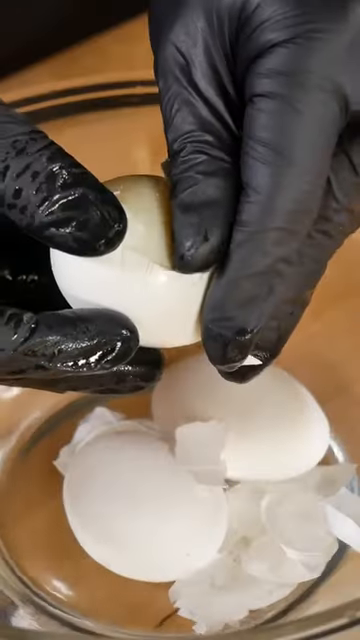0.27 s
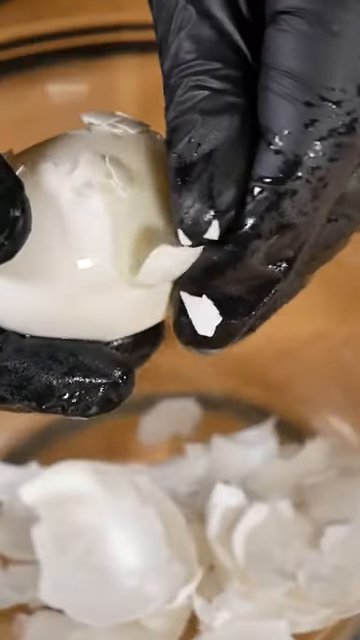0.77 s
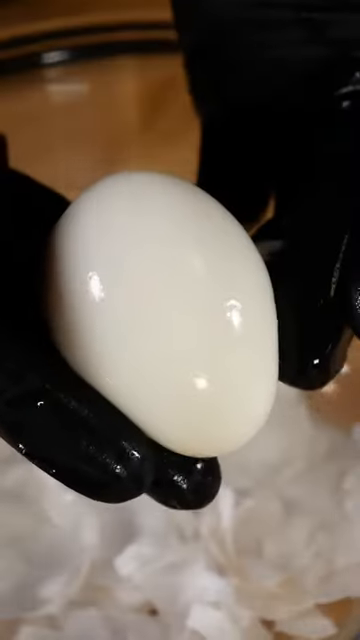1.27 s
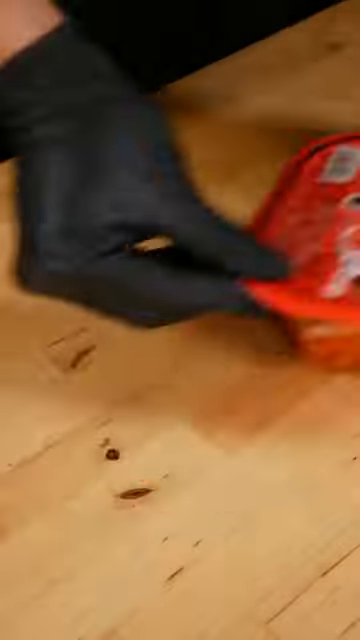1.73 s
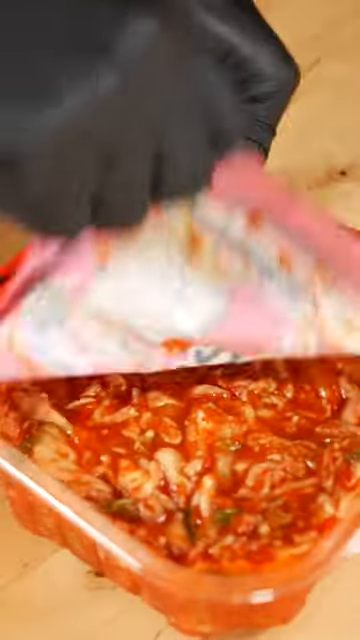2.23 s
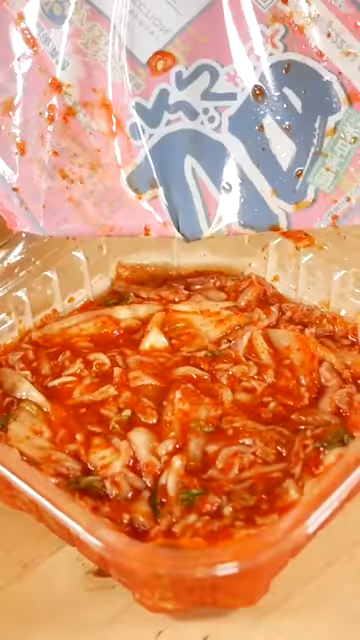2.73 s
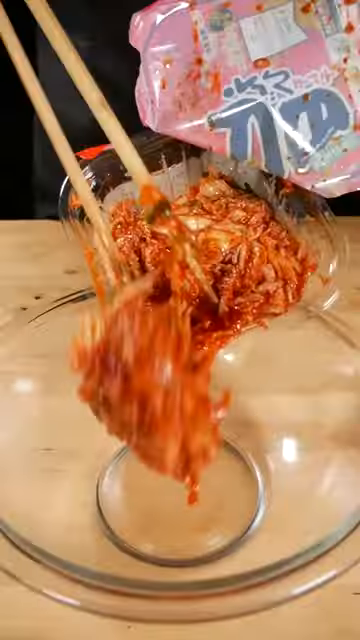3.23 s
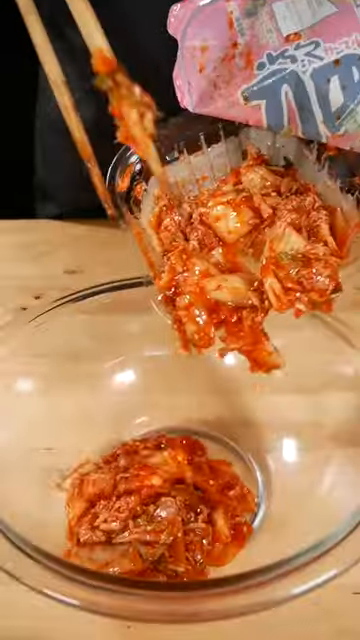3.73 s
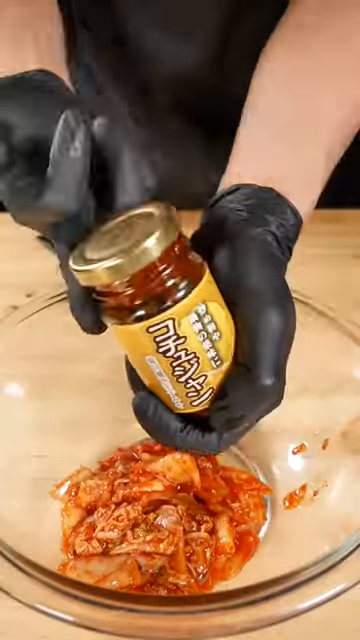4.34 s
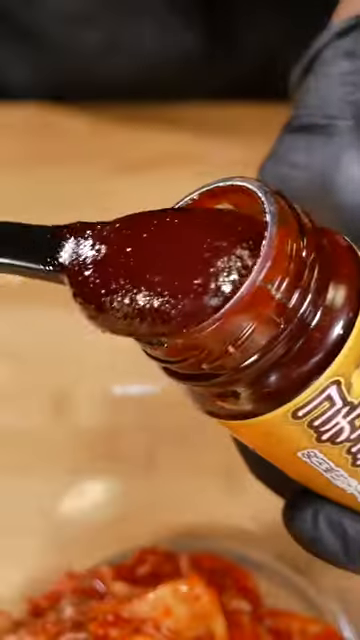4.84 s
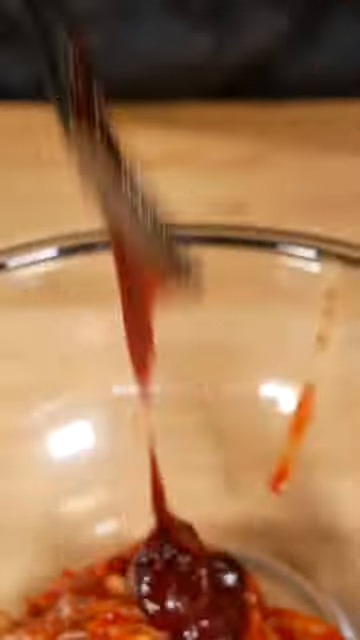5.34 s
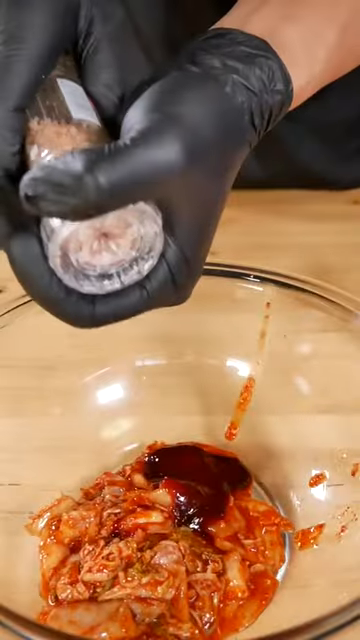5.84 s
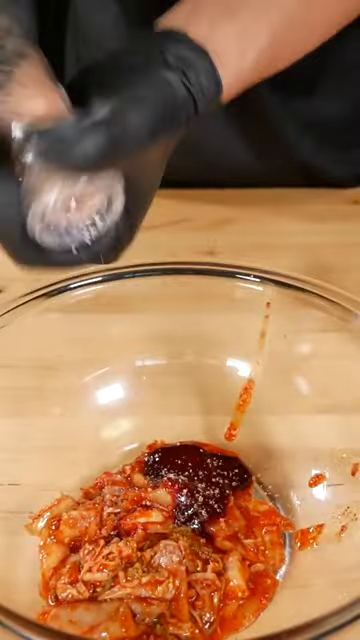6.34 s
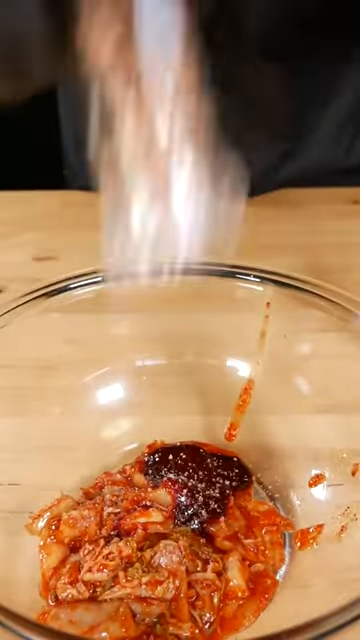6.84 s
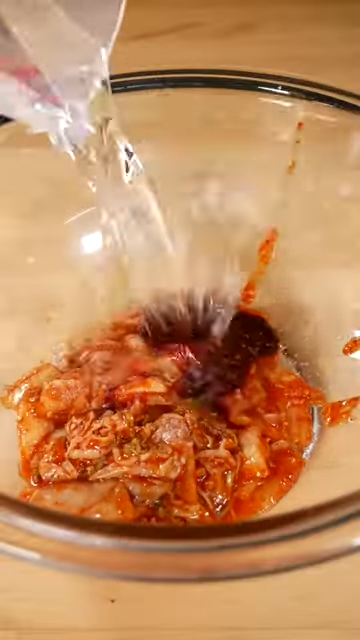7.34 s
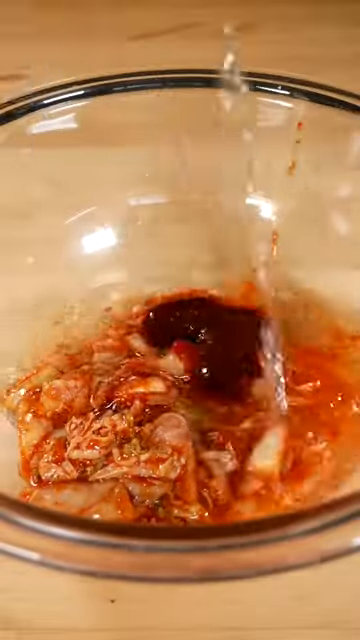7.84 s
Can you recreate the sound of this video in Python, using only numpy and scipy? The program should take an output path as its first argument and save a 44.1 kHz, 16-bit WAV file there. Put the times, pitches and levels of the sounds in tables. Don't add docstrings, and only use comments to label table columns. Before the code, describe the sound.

Close, dry mono kitchen handling in a small room, cutting abruptly between actions. From 0 to 1 s brittle eggshell snaps in bright, uneven clusters, strongest near 0.05, 0.4 and 0.75, over rustling gloves. Near silence until 1.77, when a plastic tray slides briefly over wood; from 2.0 to 2.55 its film rips in crackling tears with dull puffs. Thin plastic pops at 2.85-3.1. A wet lump slaps the glass bowl at 3.37, ringing it; a softer one lands at 3.74. Gloves creak at 3.95, then a metal lid stick-slips harshly until 4.35 and pops off ringing at 4.48. A muffled spoon scoop at 4.8 and faint plop at 5.25 follow. Salt crystals slide at 5.5, a mill crunches in short twists until 6.6, then five sharp rattling shakes until 7.35. Water pours with high bubbles, fizz and glassy ringing until 7.95, ending in faint wet stirring.

```python
import sys
import numpy as np
from scipy import signal
from scipy.fft import rfft, irfft
from scipy.io import wavfile

SR = 44100
rng = np.random.default_rng(int(sys.argv[2]) if len(sys.argv) > 2 else 0)


def master_out(mix):
    frames = np.transpose(np.atleast_2d(mix))
    ceiling = np.clip(frames, -1, 1)
    pcm = np.round(ceiling * 32767).astype(np.int16)
    wavfile.write(sys.argv[1], SR, pcm)


def magnitude_from_level(level_db):
    exponent = np.asarray(level_db, float) / 20
    return 10 ** exponent


N = 357210
SIZE = 4096

CUTS = [0, .24, .54, 1.772, 1.975, 2.8, 3.127, 3.576, 3.94, 4.378, 4.71, 5.477, 5.812, 6.13, 6.281, 6.445,
        6.64, 7.37, 7.95, 9]
LOW_NEXT = [0, 2, 1]
LOW_FIRST = [2, 0, 1]
# (attack from [dB], drift while held [dB], release [s], release [dB])
FLEX = (-10.5, 0.5, -0.01, -33)
# (frequency [Hz], density [dB per Hz])
AIR = [(15, -53.5), (25, -31), (108, -4), (263, -4), (326, -10.5), (476, -9.5), (1330, -20), (2840, -25),
       (12900, -22), (16000, -21.5)]
# (frequency [Hz], density [dB per Hz])
SHELL = [(100, -36), (600, -22.5), (1500, -21), (2300, -8.5), (5000, -5.5), (9000, -0.5), (13000, -1.5),
         (16000, -2)]
# (frequency [Hz], density [dB per Hz])
FILM = [(100, -11), (500, -3.5), (1500, -5), (4500, -8), (7000, -6), (12000, -4.5), (16000, -9.5)]
# (frequency [Hz], density [dB per Hz])
FOOD = [(59, -48), (100, -9.5), (770, -6.5), (1030, -8.5), (2450, -20), (3160, -23), (15300, -16.5)]
# (frequency [Hz], density [dB per Hz])
LID = [(59, -62), (100, -30), (770, -21), (1010, -16.5), (4060, -20), (7970, -11.5), (15300, -11.5)]
# (frequency [Hz], width [Hz], height over the colour [dB])
LID_RINGS = [(1060, 180, 10), (1200, 110, 11), (1465, 110, 18), (3440, 250, 9.5), (4630, 130, 11),
             (5720, 100, 15), (6600, 350, 6), (7884, 260, 17), (8400, 250, 8), (10400, 200, 7),
             (12200, 230, 19), (12650, 350, 17), (13800, 270, 7)]


def evened(x):
    return x / np.sqrt(np.mean(x ** 2) + 1e-20)


def read(points, hz):
    f, value = np.transpose(points)
    return np.interp(np.log(hz + 1), np.log(f + 1), value)


def add(mix, s, sound):
    part = mix[max(round(s * SR), 0):][:len(sound)]
    part += sound[:len(part)]


def body(colour, rings=(), split=9000):
    hz = np.fft.rfftfreq(SIZE, 1 / SR) + 1
    peaks = sum(magnitude_from_level(db) / np.hypot(1, 2 * (hz - f) / width) ** 2 for f, width, db in rings)
    gain = magnitude_from_level(read(colour, hz)) * (1 + peaks)
    bands = [(1800, split), (split, 30000), (100, 1800)]
    gains = [gain / np.sqrt((1 + (lo / hz) ** 6) * (1 + (hz / hi) ** 6)) for lo, hi in bands]
    cepstrum = irfft(np.log(np.array(gains) + 1e-9))
    cepstrum[:, 1:SIZE // 2] *= 2
    cepstrum[:, SIZE // 2 + 1:] = 0
    return irfft(np.exp(rfft(cepstrum)))[:, :SIZE // 2]


def strokes(rows, rule):
    attack_db, hold_db, release_s, release_db = rule
    for s, attack_s, hold_s, db in rows:
        times = np.cumsum([s, attack_s, hold_s, abs(release_s)])
        levels = db + np.cumsum([attack_db, -attack_db, hold_db, release_db])
        yield [*zip(times, levels), (min(cut for cut in CUTS if cut > times[1]), None)]


def rub(curves, shape, follow_db, per_s, spread_db, grain_s, smooth):
    out = np.zeros(N)
    for *rows, (end, last_db) in curves:
        s, level_db = np.transpose(rows if last_db is None else rows + [(end, last_db)])
        stop = min(end, s[-1])
        t = np.arange(s[0] - .05, s[0] + 1.6, 1 / SR)
        chance = rng.random(len(t))
        size = rng.exponential(1, len(t))
        hiss = rng.standard_normal(len(t))
        count = round((stop - s[0] + .3) * SR)
        t, chance, size, hiss = (v[:count] for v in (t, chance, size, hiss))
        hits = magnitude_from_level(spread_db * np.minimum(size, 4)) * np.clip((per_s / SR - chance) * SR / 20, 0, 1)
        grains = signal.lfilter([1], [1, -np.exp(-1 / (grain_s * SR))], hits)
        drive = (evened(grains) + smooth) * hiss
        bands = signal.fftconvolve(drive[None], shape, axes=1)[:, :len(t)]
        sound = sum(evened(b) * magnitude_from_level(db) for b, db in zip(bands, [0, *follow_db]))
        sound = sound * magnitude_from_level(np.interp(t, s, level_db))
        add(out, s[0], sound[(t >= s[0]) & (t < stop)])
    return out


def cracks(rows, shape, usual, power, rise_s=0.00033):
    out, t = np.zeros(N), np.arange(SIZE) / SR
    for s, db, *more in rows:
        second_db, third_db, life = more + usual[len(more):]
        fade = magnitude_from_level(-60 * (t / max(life, .002)) ** power)
        burst = rng.standard_normal(SIZE) * fade * (1 - np.exp(-t / rise_s))
        bands = signal.fftconvolve(burst[None], shape, axes=1)[:, :SIZE]
        bands /= abs(bands).max(axis=1, keepdims=True)
        add(out, s, magnitude_from_level([db, db + second_db, db + third_db]) @ bands)
    return out


def snaps(rows, colour, share, lift_db, life, power, low_db=-18, rings=()):
    out, t = np.zeros(N), np.arange(SIZE // 2) / SR
    for s, db, hz, *own_low_db in rows:
        shape = body(colour, [(hz, share * hz, lift_db), *rings], split=30000)[::2]
        burst = rng.standard_normal(len(t)) * magnitude_from_level(-60 * (t / life) ** power)
        bands = signal.fftconvolve(burst[None], shape, axes=1)[:, :len(t)]
        bands /= abs(bands).max(axis=1, keepdims=True)
        add(out, s, magnitude_from_level([db, db + [*own_low_db, low_db][0]]) @ bands)
    return out


def glide(s, length, db, from_hz, to_hz, width_hz):
    t, out = np.arange(0, length, 1 / SR), np.zeros(N)
    noise = ([1, 1j] @ rng.standard_normal((2, SIZE * 4)))[:len(t)]
    slow = signal.lfilter([1], [1, -np.exp(-np.pi * width_hz / SR)], noise)
    turn = np.exp(2j * np.pi * np.cumsum(from_hz + (to_hz - from_hz) * t / length) / SR)
    add(out, s, magnitude_from_level(db) * evened((slow * turn).real) * np.sin(np.pi * t / length) ** .5)
    return out


def air():
    hz = np.fft.rfftfreq(N, 1 / SR)
    tone = irfft(rfft(rng.standard_normal(N)) * magnitude_from_level(read(AIR, hz)), N)
    return magnitude_from_level(-65.5) * evened(tone)


def kitchen(x):
    # (frequency [Hz], t60 [s])
    room = [(200, 0.18), (1000, 0.27), (4000, 0.22), (12000, 0.11)]
    taps = np.zeros(SR // 2)
    at = np.arange(200, len(taps) - 20, 20)
    taps[at + rng.integers(0, 20, len(at))] = rng.choice([-1., 1.], len(at))
    hz, t, z = signal.stft(taps, SR, nperseg=256)
    tail = signal.istft(z * magnitude_from_level(-60 * t / read(room, hz)[:, None]), SR, nperseg=256)[1]
    edges = (np.array(CUTS) * SR).astype(int)
    shots = [signal.fftconvolve(x[a:b], tail)[:len(x[a:b])] for a, b in zip(edges, edges[1:])]
    return np.concatenate(shots) / np.linalg.norm(tail)


def shell_rustle():
    # (time [s], level [dB])
    rustles = [
        [(0, -46.5), (.07, -38.5), (.15, -47), (.24, -46)],
        [(.24, -61.5), (.36, -54.5), (.42, -46.5), (.54, -54)],
        [(.54, -44), (.7, -49), (.8, -45), (.9, -57.5), (1.05, -60.5)],
    ]
    # (frequency [Hz], width [Hz], height [dB])
    hollows = [(5000, 1500, 8), (9000, 2000, 6), (9500, 4000, 6)]
    # (start [s], attack [s], hold [s], level [dB])
    drag = [(.38, .11, 0.047, -47)]
    out = rub(strokes(drag, FLEX), body(AIR)[LOW_FIRST], [-30, -30], 320, 2.3, 0.00197, .8)
    for curve, hollow in zip(rustles, hollows):
        shape = body(SHELL, [hollow], split=14000)
        out += rub([curve], shape, [-8, -14], per_s=400, spread_db=4.0, grain_s=0.00073, smooth=0.44)
    return out


def shell_snaps():
    # (time [s], peak [dB], favoured pitch [Hz])
    rows = [(0.0144, -12.5, 5300), (0.0398, -2.5, 4710), (0.0464, -13, 5500), (0.0613, -5, 5240),
            (0.1022, -22, 5070), (0.1254, -24, 5480), (0.1346, -24, 7890), (0.1785, -32, 7810),
            (0.2084, -10.5, 13300), (0.2234, -27, 4160), (0.2354, -28, 8040), (0.2558, -24.5, 12200),
            (0.2674, -27.5, 10500), (0.2962, -25.5, 9470), (0.3232, -26, 8900), (0.3506, -16, 12200),
            (0.3755, -14.5, 8890), (0.3834, -12.5, 12200), (0.402, -5, 3660), (0.4189, -4, 10200),
            (0.4254, -14, 2330), (0.4938, -13, 2300), (0.5307, -23, 8520), (0.5454, -17.5, 4990),
            (0.5516, -14, 4440), (0.5975, -7.5, 6010), (0.6084, -10.5, 14000), (0.6154, -13, 9130),
            (0.6294, -24.5, 8030), (0.6888, -2.5, 6570), (0.7248, -23, 9750), (0.7404, -28.5, 10200),
            (0.7567, -3, 7000), (0.7716, 1.5, 10350), (0.7804, -1.5, 7500), (0.7894, -5.5, 10600),
            (0.7964, -8.5, 10900), (0.8044, -12.5, 11100), (0.847, -25, 8890), (0.8909, -29, 9050),
            (0.9173, -8, 6400), (0.9494, -31, 6100), (1.0234, -47, 8000), (1.0634, -45, 4720)]
    # (frequency [Hz], width [Hz], height [dB])
    egg_rings = [(2300, 350, 7.5), (3830, 410, 9)]
    # (from [s], to [s])
    held_from, held_to = (.24, .605)
    held = [row for row in rows if held_from < row[0] < held_to]
    flakes = [row for row in rows if row not in held]
    out = snaps(flakes, SHELL, share=0.35, lift_db=12.5, life=.016, power=.6, low_db=-21.5)
    return out + snaps(held, SHELL, share=0.35, lift_db=6.5, life=.018, power=0.65, low_db=-15, rings=egg_rings)


def thumps():
    # (time [s], peak [dB])
    rows = [(0.771, -48.5), (2.217, -34), (2.471, -29.5), (3.369, -35), (3.742, -52), (4.11, -32),
            (4.242, -36.5), (4.479, -32.5), (5.99, -29), (6.186, -31.5), (6.385, -46), (6.498, -37),
            (6.762, -37), (6.965, -52), (7.135, -51), (7.31, -53)]
    out, t = np.zeros(N), np.arange(SIZE) / SR
    for s, db in rows:
        push = signal.lfilter(*signal.butter(2, 90, fs=SR), rng.standard_normal(SIZE)) * t * np.exp(-t / 0.016)
        add(out, s - .005, magnitude_from_level(db) * push / abs(push).max())
    return out


def tray_pops():
    # (time [s], peak [dB], favoured pitch [Hz], low band relative [dB])
    rows = [(1.3134, -50, 2040, 1), (1.6347, -43.5, 3000, -16), (2.805, -32.5, 5330, -16),
            (2.8404, -36, 2640, -6), (2.8589, -13.5, 3460, -10.5), (2.9154, -40.5, 2130, 3),
            (2.9552, -35, 2110, 2.5), (2.9667, -28.5, 5040, -5), (2.9974, -36, 1870, 4),
            (3.019, -19.5, 1990, -3), (3.0545, -31.5, 6650, -9), (3.0914, -28.5, 2320, 3.5),
            (3.1044, -35, 1890, 4.5), (3.1154, -39, 1990, 5.5), (3.2969, -36.5, 1830, -5)]
    # (frequency [Hz], density [dB per Hz])
    pop = [(59, -44.5), (100, -9), (1510, -5), (2780, -11.5), (5120, -7.5), (15300, -28.5)]
    return snaps(rows, pop, share=.45, lift_db=5.5, life=0.028, power=0.67)


def tray_slide():
    # (start [s], attack [s], hold [s], level [dB])
    rows = [
        (1.772, 0.0014, 0.14, -32.5),
        (2.8, 0.17, .12, -61.5),
    ]
    # (attack from [dB], drift while held [dB], release [s], release [dB])
    slide = (-7, -1, .07, -13)
    # (frequency [Hz], density [dB per Hz])
    wood = [(59, -44), (100, -17.5), (589, -2), (774, -5), (2090, -1.5), (3930, -8), (6660, -6.5),
            (15500, -7.5)]
    shape = body(wood, [(520, 200, 4)])[LOW_NEXT]
    return rub(strokes(rows, slide), shape, [-5, -11], per_s=2400, spread_db=1.7, grain_s=0.00099, smooth=0.96)


def film_peel():
    # (time [s], level [dB])
    pull = [(1.975, -46), (2.08, -36), (2.14, -25.5), (2.19, -30.5), (2.23, -25), (2.28, -28.5),
            (2.43, -36), (2.53, -33), (2.56, -62)]
    # (time [s], peak [dB], favoured pitch [Hz])
    tears = [(1.9773, -15.5, 7140), (1.9924, -31, 10100), (2.0049, -23.5, 6900), (2.0137, -22, 7300),
             (2.0226, -22, 7180), (2.0335, -19.5, 7150), (2.0744, -25, 7680), (2.1174, -19, 6590),
             (2.1274, -15.5, 6050), (2.1424, -23, 5460), (2.1494, -15.5, 5760), (2.161, -18, 6920),
             (2.1675, -13.5, 10000), (2.1974, -17.5, 8960), (2.2215, -8, 5070), (2.233, -14, 3140),
             (2.2474, -11, 9670), (2.2622, -16, 3040), (2.3, -14, 3810), (2.3104, -14, 5820),
             (2.318, -12.5, 2970), (2.3444, -11.5, 8780), (2.3558, -18, 2710), (2.3779, -9.5, 10400),
             (2.383, -8.5, 6750), (2.3967, -9.5, 2530), (2.414, -11, 8300), (2.425, -19, 3180),
             (2.4485, -14, 3280), (2.4694, -11.5, 9020), (2.4781, -8, 3650), (2.5169, -14, 9320),
             (2.5258, -10.5, 5040), (2.5332, -11.5, 6590), (2.5434, -26, 3040), (2.632, -31.5, 5410)]
    # (start [s], attack [s], hold [s], level [dB])
    flexes = [(2.06, 0.06, 0.1, -31.5), (2.2, 0.021, 0.026, -28), (2.45, 0.025, 0.015, -25)]
    # (frequency [Hz], density [dB per Hz])
    plastic = [(59, -52), (100, -11.5), (258, -14), (550, -6), (1030, -5.5), (1680, -8.5), (7170, -2),
               (15300, -5)]
    peel = rub([pull], body(FILM)[LOW_NEXT], [-7, -7], per_s=700, spread_db=3.8, grain_s=0.002, smooth=0.8)
    flex = rub(strokes(flexes, FLEX), body(plastic)[LOW_FIRST], [-9, -18],
               per_s=243, spread_db=-2.5, grain_s=0.0037, smooth=0.65)
    return peel + flex + snaps(tears, FILM, share=0.58, lift_db=9, life=.021, power=1.1, low_db=-9)


def food():
    # (start [s], attack [s], hold [s], level [dB])
    squelches = [(3.127, .23, 0.0045, -63), (3.576, .12, 0.055, -63), (3.94, .005, 0.041, -50),
                 (5.16, .04, 0.11, -63)]
    # (attack from [dB], drift while held [dB], release [s], release [dB])
    squelch = (-7, 0.5, .1, -18)
    # (time [s], main peak [dB], second band [dB], third band [dB], length [s])
    slaps = [(3.369, -9, -6), (3.3727, -5, -4, -2, .11), (3.3907, -17, -25), (3.4166, -20, -26),
             (3.7402, -16, -18), (3.7594, -24, -21), (3.712, -38, -8, -4, .09), (5.2489, -24.5, -12, -10)]
    shape = body(FOOD)
    out = cracks(slaps, shape, [0, -11, .05], 0.63, rise_s=0.00046)
    return out + rub(strokes(squelches, squelch), shape, [-4, -3], 400, 2.2, 0.0018, 1.2)


def bowl():
    # (time [s], level [dB], favoured pitch [Hz], reach [octaves])
    blows = [(3.372, -41, 170, .3), (3.37, -40, 535, 0.5), (3.373, -38, 2500, 0.66), (7.372, -64, 540, .4),
             (7.38, -68, 1428, .4), (3.741, -50, 1400, 0.65), (7.405, -52, 9800, 0.17),
             (7.435, -58.5, 8000, 0.28), (7.478, -53, 5900, 0.41), (7.511, -38.5, 1428, 0.42),
             (7.507, -48, 8860, 0.27)]
    # (frequency [Hz], split of the pair [Hz], t60 [s])
    modes = [(170, 11, .45), (540, 5, .8), (1428, 7.7, 1.0), (2638, 2, .4), (4124, 6, .15), (5846, 8, .15),
             (7677, 9, .15), (8230, 9, .12), (9485, 9, .15), (11500, 9, .1), (13500, 9, .12)]
    out = np.zeros(N)
    for s, db, blow_hz, reach in blows:
        t = np.arange(0, min(c for c in CUTS if c > s) - s, 1 / SR)
        strike = 1 + 2.4 * np.exp(-t / 0.0093)
        for hz, split, t60 in modes:
            share_db = -6. * (np.log2(hz / blow_hz) / reach) ** 2
            twin = 0.62 * (s > 7 or hz < 1000)
            pair = np.sin(2 * np.pi * hz * t) + twin * np.sin(2 * np.pi * (hz + split) * t)
            damping = 1.1 if s > 7.5 else 1
            add(out, s, magnitude_from_level(db + share_db - 60 * t / t60 * damping) * strike * pair)
    return out


def glove_grip():
    # (time [s], peak [dB], favoured pitch [Hz])
    rows = [(3.698, -44, 7000), (3.885, -48, 5400), (3.9135, -42, 8880), (3.9404, -29.5, 5680),
            (3.9499, -15.5, 6970), (3.9564, -17, 7070), (3.9764, -19.5, 8970), (3.9834, -21.5, 6110)]
    return snaps(rows, FILM, share=.4, lift_db=13, life=.012, power=.8, low_db=-13)


def gliding_scrapes():
    # (start [s], length [s], level [dB], from [Hz], to [Hz], width [Hz])
    lid = [(3.972, 0.0354, -34.5, 610, 728, 120), (3.99, .075, -39, 791, 1242, 200)]
    # (start [s], length [s], level [dB], from [Hz], to [Hz], width [Hz])
    spoon = [(5.25, .04, -50, 800, 780, 60), (8.02, .12, -60, 600, 590, 50)]
    return sum(glide(*row) for row in [*lid, *spoon])


def lid_turn():
    # (start [s], attack [s], hold [s], level [dB])
    turns = [(4.0, 0.07, 0.28, -33)]
    # (attack from [dB], drift while held [dB], release [s], release [dB])
    turn = (-22.5, -13, 0.03, -25)
    # (time [s], main peak [dB], second band [dB], third band [dB])
    slips = [(4.0352, -35.5, 8, -20.5), (4.0444, -33.5, 5, -18), (4.0581, -22, 8, -11),
             (4.0707, -13, 7, -12), (4.0923, 1, -9.5, -9), (4.1083, 1, -9, -13), (4.129, 1, -15, -12.5),
             (4.1535, -16.5, -3.5, -4), (4.1578, -1, -11, -6.5), (4.1766, 0.5, -15, -12),
             (4.1908, -1.5, -7, -13), (4.213, -20, 0, -8), (4.245, 1.5, -10, -11.5),
             (4.2544, -3, -11.5, -6), (4.2722, -10.5, -6, -13), (4.2811, -4.5, -7.5, -16),
             (4.285, -4, -9, -16), (4.3004, -14, -2, -14), (4.3071, -13, -4, -13), (4.3115, -10.5, -5, -10),
             (4.3233, -8.5, -7, -14.5), (4.3327, -16, -8, -4.5), (4.34, -17, -10.5, -3),
             (4.3516, -14, -6, -11)]
    out = rub(strokes(turns, turn), body(LID, LID_RINGS)[LOW_FIRST], [-6, -14], 330, 2.8, 0.0014, 0.53)
    for slip in slips:
        seat = rng.standard_normal((len(LID_RINGS), 2))
        rings = [(hz * (1 + .012 * a), w, db + 2.5 * b) for (hz, w, db), (a, b) in zip(LID_RINGS, seat)]
        out += cracks([slip], body(LID, rings)[LOW_NEXT], [-8, -8, .02], 1.8, rise_s=0.0015)
    return out


def lid_pop():
    # (time [s], main peak [dB], second band [dB], third band [dB], length [s])
    pops = [
        (4.2233, -17.5, -12, -5, .02),
        (4.2405, -4, -8.5, -9.5, .02),
        (4.4804, 4.5, -9, -5.5, .025),
        (4.4963, 1.5, -14, -10.5, 0.018),
        (4.447, -47, -31, -2.5, 0.11),
    ]
    # (frequency [Hz], width [Hz], height [dB])
    freed_rings = [(1480, 130, 15), (3480, 200, 13)]
    # (start [s], attack [s], hold [s], level [dB])
    rows = [(4.49, .01, .01, -31)]
    # (attack from [dB], drift while held [dB], release [s], release [dB])
    ring = (-10.5, -4.5, 0.19, -36.5)
    freed = body(LID, LID_RINGS + freed_rings)
    out = cracks(pops[:2], body(LID, LID_RINGS)[LOW_NEXT], [], 1.5, rise_s=.002)
    out += cracks(pops[2:], freed[LOW_NEXT], [], 1.3, rise_s=.003)
    return out + rub(strokes(rows, ring), freed, [-9, -4], 300, 1.5, .003, 1.5)


def jar_scoop():
    # (start [s], attack [s], hold [s], level [dB])
    rows = [(4.71, 0.148, 0.027, -55.5)]
    # (frequency [Hz], density [dB per Hz])
    colour = [(59, -80), (100, -37), (436, -13), (647, -10), (755, -30.5), (6000, -60), (7800, -80.5),
              (13200, -120)]
    # (frequency [Hz], width [Hz], height [dB])
    hollow = [(436, 91, 15)]
    return rub(strokes(rows, FLEX), body(colour, hollow)[LOW_FIRST], [-18, -40], 410, 3.9, 0.0032, 0.77)


def salt_shake():
    # (frequency [Hz], density [dB per Hz])
    salt = [(59, -49.5), (100, -17.5), (874, -27.5), (1480, -15.5), (4060, -14.5), (5930, -5), (9630, 8),
            (15300, -15)]
    # (frequency [Hz], width [Hz], height [dB])
    rings = [(6000, 1800, 4.5), (9700, 580, 1.2), (13800, 3200, 2.7)]
    # (start [s], attack [s], hold [s], level [dB])
    tips = [(5.479, 0.11, 0.04, -32), (5.722, 0.051, 0.15, -51), (5.901, 0.045, 0.031, -46)]
    # (start [s], attack [s], hold [s], level [dB])
    shakes = [(6.679, 0.0018, 0.03, -35.5), (6.741, 0.009, 0.019, -34), (6.893, 0.0028, 0.055, -30),
              (7.07, 0.002, 0.049, -31), (7.234, 0.0025, 0.057, -29)]
    # (attack from [dB], drift while held [dB], release [s], release [dB])
    shake = (-20, 10.5, -0.12, -52)
    # (time [s], level [dB])
    trickle = [(5.82, -63), (6.15, -45.5), (7.37, -63)]
    # (time [s], main peak [dB], second band [dB], third band [dB], length [s])
    knocks = [(5.9328, -33), (5.9626, -30), (6.762, -1, -3, -20, .04), (6.8386, -28, -3, -6), (6.9484, -10),
              (6.968, -3.5), (7.1336, -6.5), (7.1397, -2.5), (7.2727, -18), (7.3105, -2)]
    high_first = [1, 0, 2]
    tube = body(salt, rings)
    loosen_s = 0.039
    loosen = [(s - loosen_s, loosen_s, 0, db - 2.5) for s, _, _, db in shakes]
    slides = [*strokes(shakes, shake), *strokes(loosen + tips, FLEX), trickle]
    out = rub(slides, tube, [-3, -20], per_s=480, spread_db=5.0, grain_s=0.0014, smooth=0.88)
    landings = [(s, db + 19) for s, _, _, db in shakes]
    out += cracks(landings, body(salt, [(12200, 550, 14)])[high_first], [-12, -30, .022], 1.7, rise_s=0.0025)
    return out + cracks(knocks, tube, [-3, -22, .025], 1.28, rise_s=.003)


def mill_grind():
    # (frequency [Hz], density [dB per Hz])
    mill = [(59, -44), (100, -18), (275, -20.5), (665, -11), (893, -22.5), (1750, -4), (3810, -10.5),
            (7400, 3), (15300, 0)]
    # (frequency [Hz], width [Hz], height [dB])
    rings = [(2900, 900, 3)]
    # (start [s], attack [s], hold [s], level [dB])
    twists = [(5.632, 0.0055, 0.019, -17.5), (5.987, 0.0023, 0.041, -13.5), (6.15, 0.041, 0.017, -11.5),
              (6.338, 0.052, 0.017, -14.5), (6.499, 0.00079, 0.065, -17)]
    # (attack from [dB], drift while held [dB], release [s], release [dB])
    grind = (-28, -1, 0.063, -55.5)
    settle = (4, -10.5, -1, -22)
    # (time [s], peak [dB])
    crushes = [(5.6198, -25), (5.9892, -4), (6.026, -2.5), (6.0494, -13), (6.1623, -14), (6.1721, -11),
               (6.2753, -12.5), (6.354, -11), (6.367, -15), (6.4174, -4.5), (6.5449, -18), (6.5732, -7),
               (6.5842, -16)]
    burrs = body(mill, rings)
    crumbs = [(s + attack_s + hold_s, 0, 0, db - 24.5) for s, attack_s, hold_s, db in twists]
    curves = [*strokes(twists, grind), *strokes(crumbs, settle)]
    out = rub(curves, burrs, [-5, -13], per_s=750, spread_db=3.3, grain_s=0.0012, smooth=0.58)
    return out + cracks(crushes, burrs, [-5, -14, .012], 0.64)


def water():
    # (frequency [Hz], density [dB per Hz])
    colour = [(35, -46), (60, -22.5), (785, -19), (1010, -28), (1410, -13), (1550, -23), (8120, 9),
              (16000, -18.5)]
    # (start [s], attack [s], hold [s], level [dB])
    fizz = [(7.37, 0.2, .37, -45), (7.95, .01, 0.15, -53)]
    # (attack from [dB], drift while held [dB], release [s], release [dB])
    pour = (-6, -3, 2, -7)
    # (time [s], peak [dB], pitch [Hz])
    drops = [(7.379, -23.5, 5370), (7.433, -28, 6600), (7.458, -21, 8450), (7.5177, -25, 3040),
             (7.5257, -20, 7400), (7.535, -21, 5540), (7.574, -31.5, 2600), (7.607, -27, 7900),
             (7.6245, -27, 1980), (7.659, -30, 9400), (7.7135, -19.5, 7630), (7.552, -36, 2600),
             (7.79, -32.5, 2150), (7.824, -29, 8700), (7.849, -21, 7860), (7.866, -19, 8900),
             (7.876, -22.5, 7850), (7.906, -42.5, 4800), (7.923, -17, 8400)]
    shape, t = body(colour), np.arange(2000) / SR
    out = rub(strokes(fizz, pour), shape, [-4, -11], per_s=270, spread_db=6.5, grain_s=0.0018, smooth=0.41)
    when, size, pitch = rng.random((200, 3)).T
    swarm = zip(7.5 + .44 * when, -46. + 13.0 * size ** 3, 3000 * 4 ** pitch)
    for (s, db, hz), short in zip([*drops, *swarm], [*np.ones(len(drops)), *size]):
        life = 9.1 / hz * max(short, .45)
        bubble = np.sin(2 * np.pi * hz * t * (1 + 0.035 * t / life)) * np.exp(-t / life)
        add(out, s, magnitude_from_level(db - 4.5) * bubble)
    ticks = [(s, db - 3.0) for s, db, hz in drops]
    slosh_curve = [(7.37, -62), (7.75, -59), (8.1, -57)]
    slosh = rub([slosh_curve], body(FOOD)[LOW_FIRST], [-2.5, -12], 150, 4, .004, .6)
    return out + slosh + cracks(ticks, shape, [-4, -20, .008], 1.0)


def spatter():
    # (time [s], peak [dB], favoured pitch [Hz])
    rows = [(7.4792, -26.5, 5750), (7.544, -26, 5890), (7.56, -29, 2630), (7.598, -29, 4540),
            (7.6374, -24, 1910), (7.765, -46, 450), (7.6899, -37, 5950), (7.6974, -30, 5780),
            (7.7063, -24, 7640), (7.7425, -29.5, 5490), (7.7573, -29, 6120), (7.771, -35, 4180),
            (7.7974, -40, 2450), (7.828, -30, 8180), (7.9094, -32, 4700), (7.9494, -40, 2210),
            (7.9867, -47, 2190), (8.003, -42, 1870), (8.0711, -29, 1300), (8.0914, -44, 7990)]
    return snaps(rows, SHELL, share=0.26, lift_db=19, life=0.014, power=0.82)


def scene():
    close = shell_rustle() + shell_snaps() + tray_pops() + tray_slide() + film_peel()
    close += food() + bowl() + glove_grip() + lid_turn() + lid_pop() + jar_scoop()
    close += salt_shake() + mill_grind() + water() + spatter()
    return (close + magnitude_from_level(-16) * kitchen(close) + gliding_scrapes() + thumps() + air())[None]


def band_limit(x):
    return signal.sosfilt(signal.butter(12, 16500, fs=SR, output="sos"), x)


def record(dry):
    lowpass = signal.firwin(255, 15900, window=("kaiser", 8), fs=SR)
    limited = signal.oaconvolve(dry, lowpass[None], "same")
    mix = np.clip(limited, -1, 1)
    return band_limit(mix)


dry = scene()
out = record(dry)
master_out(out)
```